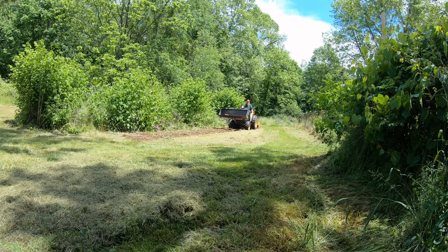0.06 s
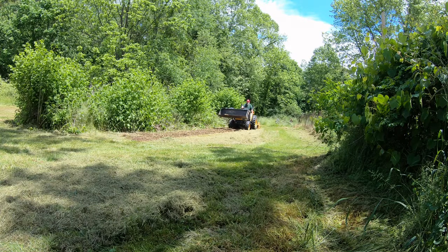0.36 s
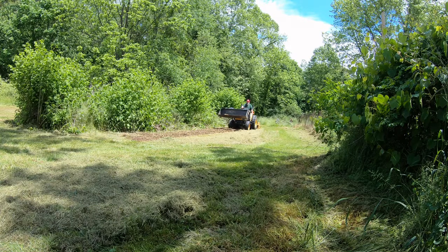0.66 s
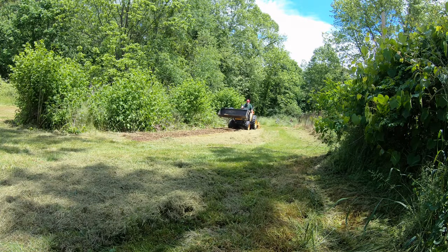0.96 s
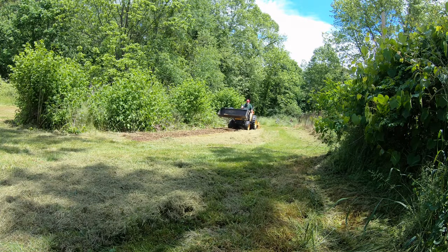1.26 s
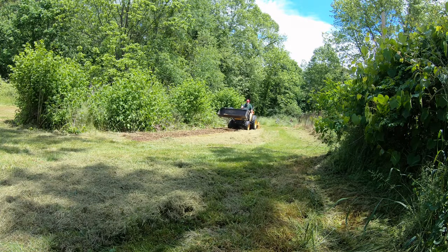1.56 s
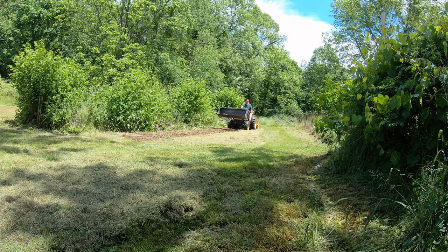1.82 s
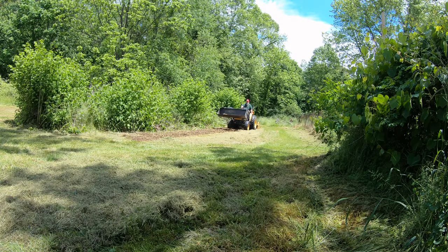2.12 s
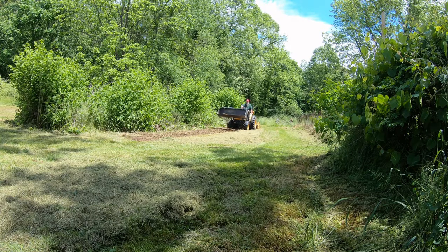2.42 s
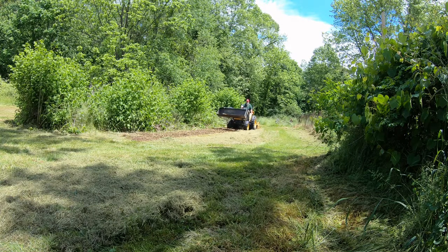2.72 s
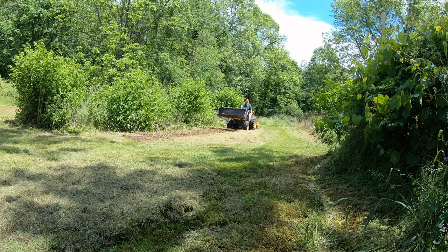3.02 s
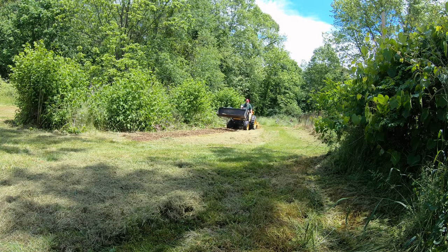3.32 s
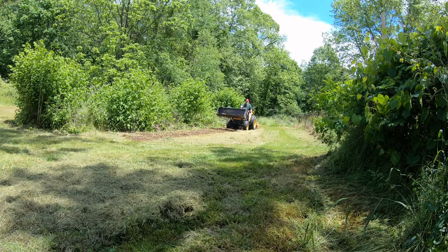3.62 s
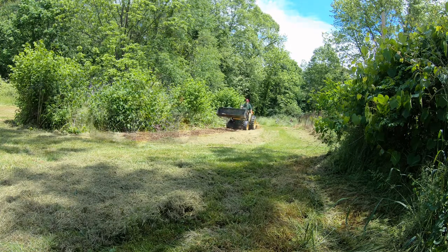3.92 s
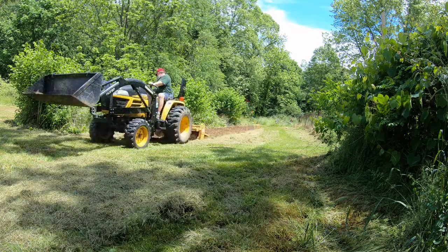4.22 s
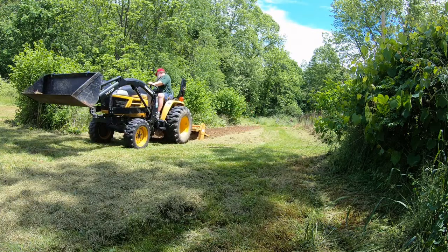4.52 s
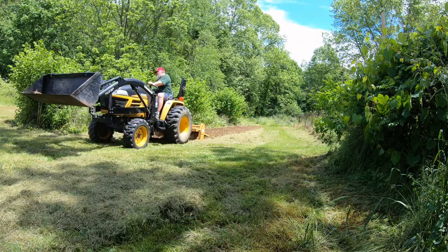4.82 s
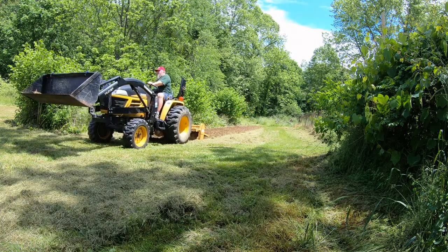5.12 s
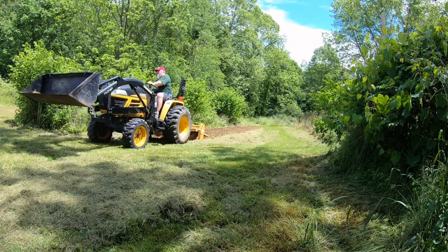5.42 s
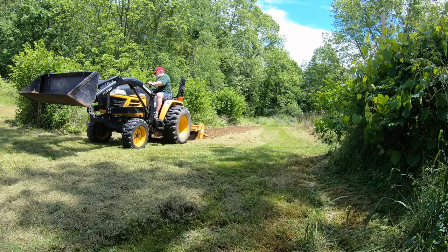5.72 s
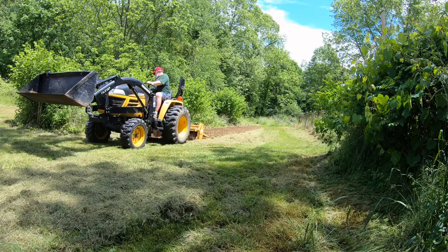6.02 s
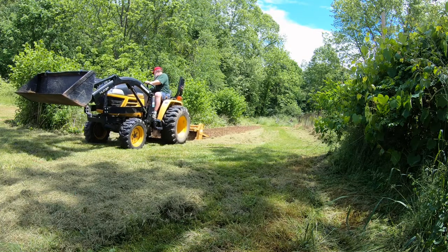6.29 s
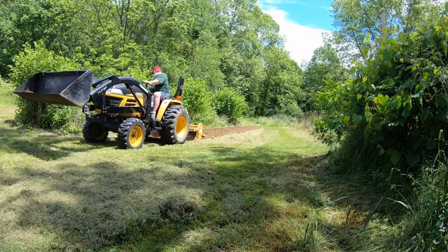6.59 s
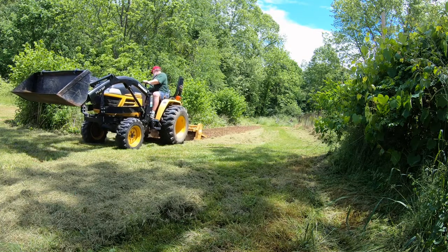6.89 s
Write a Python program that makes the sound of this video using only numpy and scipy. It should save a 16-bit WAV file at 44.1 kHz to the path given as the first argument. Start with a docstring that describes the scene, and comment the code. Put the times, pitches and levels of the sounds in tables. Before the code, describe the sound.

From the start, a diesel tractor runs at a distance in an open outdoor space, with a steady low exhaust drone and a fast, regular knocking clatter. Beneath it, a tiller makes a deep rumble and a soft hiss of crumbling soil. The engine speed barely changes, sagging slightly around 3 seconds. Between about 1.7 and 3.5 seconds, the blades catch several stones with faint, short, bright scrapes.

At about 3.8 seconds the tractor is suddenly close and clearly louder, its metallic rattle slightly to the left, joined by a thin gear whine and softly tumbling earth. The distant engine continues underneath until 5 seconds, the two drones beating gently against each other. Stones scrape briefly again near 4.6 and 6.7 seconds. The close engine labours a little more from around 6 seconds and keeps running to the end, at about 7 seconds.

```python
"""A compact tractor with a three-cylinder diesel pulls a rotary tiller through garden soil in a clearing.
The exhaust drones, the engine knocks in a pattern that repeats every cycle, gears whine, and the tines
churn soil and hit stones. Heavy soil drags the engine speed down; this load sets the level of most parts.
The tractor is heard far off, then suddenly close by on the left. For about a second both sound
together, and their exhausts beat against each other."""
import sys
import numpy as np
from scipy import signal
from scipy.io import wavfile

SR = 44100
rng = np.random.default_rng(int(sys.argv[2]) if len(sys.argv) > 2 else 0)


def to_wav(sig):
    """Store sig (one row per channel, or 1-D mono) as 16-bit WAV at the path in sys.argv[1].

    Samples outside -1..1 are clipped; the rate is SR.
    """
    pcm = np.clip(np.atleast_2d(sig), -1, 1) * 32767
    pcm = np.round(pcm).astype(np.int16)
    wavfile.write(sys.argv[1], SR, pcm.T)  # frames by channels


N = 306495
TIME = np.arange(N) / SR
NEAR_FROM_S, FAR_UNTIL_S = 3.762, 5.0
CYLINDERS = 3  # each fires once per engine cycle
FREE_HZ, SAG_HZ = 55.8, 1.1  # firing rate with no load, and its drop at full load
CYCLE_HZ = (FREE_HZ - SAG_HZ / 2) / CYLINDERS


def from_db(db):
    """Turn decibels into a gain."""
    return 10 ** (np.asarray(db) / 20)


def rms_one(x):
    """Scale a signal so that its average strength (rms) is 1."""
    return x / np.sqrt(np.mean(x ** 2) + 1e-20)


def at_hz(points, hz, column=1):
    """Read a table at any pitch, gliding between its rows."""
    columns = np.transpose(points)
    return np.interp(np.log(hz), np.log(columns[0]), columns[column])


def drift(rate_hz):
    """A slow random wobble, about 1 in size."""
    pole = np.exp(-200 * np.pi * rate_hz / SR)
    steps = rng.standard_normal(N // 100 + 1002)  # one per 100 samples
    slow = signal.lfilter([1], [1, -2 * pole, pole * pole], steps)[1000:]
    return np.interp(np.arange(N) / 100, np.arange(len(slow)), rms_one(slow))


def coloured(excite, spectrum, pan, low_hz, high_hz, count):
    """Build stereo noise in bands; excite(hz, k) gives band k's mid (shared) and side (opposed) noise."""
    out, edges, ears = 0, np.geomspace(low_hz, high_hz, count + 1), np.array([[1], [-1]])
    for k, (low, high) in enumerate(zip(edges, edges[1:])):
        hz = np.sqrt(low * high)
        band_pass = signal.butter(2, [low, high], "band", fs=SR, output="sos")
        mid, side = signal.sosfilt(band_pass, excite(hz, k))
        band = rms_one(mid) + from_db(at_hz(pan, hz, column=2)) * rms_one(side) * ears
        level = from_db(at_hz(spectrum, hz) + ears * at_hz(pan, hz) / 2)
        out = out + band * level * np.sqrt(high - low)
    return out / np.std(out.mean(axis=0))


def cyclic_noise(firings):
    """Four unrelated noises that come back alike on every engine cycle."""
    size = int(SR / CYCLE_HZ)
    position = (firings / CYLINDERS % 1 * size).astype(int)
    return rng.standard_normal((2, 2, size))[..., position]


def tone(firings, multiple, pan, flutter, wander):
    """A note that follows the engine speed; air and ground make it flutter in each ear."""
    angle = 2 * np.pi * (np.round(multiple) * firings / CYLINDERS + rng.random()) + wander * drift(5.2)
    ears = np.array([np.sin(angle + 0.35 * drift(5.3)) for _ in range(2)])
    balance = from_db(at_hz(pan, multiple * CYCLE_HZ) * np.array([[.5], [-.5]]))
    return np.sqrt(2) * ears * rms_one(1 + flutter * drift(3.4)) * balance


def under_load(load, free_db, load_db):
    """The gain of each part: its level moves in step with the load."""
    return {part: from_db(free_db[part] + load_db[part] * load) for part in free_db}


def in_tune(load, loudest_at, width):
    """The gain of a part that rings at one engine speed and fades to either side of it."""
    return np.exp(-((load - loudest_at) / width) ** 2 / 2)


# How fast the engine fires: t/s, firing rate/Hz
FAR_SPEED = [(0.0, 55.804), (1.4, 55.637), (2.6, 55.18), (3.1, 54.916), (3.45, 55.004), (3.9, 55.238),
             (4.4, 55.311), (5.0, 55.587)]
NEAR_SPEED = [(3.75, 55.206), (4.2, 55.181), (4.45, 55.17), (4.65, 55.11), (4.9, 55.403), (5.2, 55.496),
              (5.6, 55.312), (6.05, 54.682), (6.95, 54.864)]
def crankshaft(speed):
    """Count the firings so far and give the load (about 0-1): the slower, the harder the work."""
    rate = np.interp(TIME, *np.transpose(speed))
    return np.cumsum(rate) / SR, (FREE_HZ - rate) / SAG_HZ


# The exhaust's harmonics: multiple of the firing rate, level/dB (1-2 against drone, the rest against bark)
FAR_EXHAUST = [(1, 0.5), (2, -2.5), (3, 0), (4, -5.5), (5, -26), (6, -21.5), (7, -20)]
NEAR_EXHAUST = [(1, 0.5), (2, -4.5), (3, -0.5), (4, -11.5), (5, -17.5), (6, -15.5), (7, -21.5)]
def exhaust(firings, harmonics, drone, bark, waver=0.053):
    """Each firing sends one smooth push of air from the pipe; the higher harmonics waver more."""
    # the valve opens late in each firing; the open pipe end turns the push into a dip and a rebound
    opens_at, lead_rad = .66, .95
    out = 0
    for k, level_db in harmonics:
        level = from_db(level_db) * (drone if k <= 2 else bark) * (1 + waver * (k - 1) * drift(6.2))
        out = out - np.sqrt(2) * level * np.cos(2 * np.pi * k * (firings - opens_at) + lead_rad)
    return out


# Tone colour of the rushing gas: f/Hz, level/dB
RUMBLE = [(170, -6), (210, 1.5), (280, 0.5), (340, -3), (400, -8), (450, -3)]
def rumble(firings, pan, puff=0.62, puff_at=0.72, repeat=0.3):
    """Swirling gas leaves the pipe in puffs, one per firing."""
    gas = rng.standard_normal((2, 2, N)) + repeat * cyclic_noise(firings)
    gas = gas * (1 + puff * np.cos(2 * np.pi * (firings - puff_at)))
    return coloured(lambda hz, k: gas[k % 2], RUMBLE, pan, 177.5, 438, count=5)


# Knocks in one engine cycle: position/firings, f/Hz, width/octaves, level/dB, half length/firings
FAR_KNOCKS = [(0.02, 2080, .22, 7, .13), (.38, 2080, .15, 6, .13), (.28, 2400, .5, 5, .13),
              (1.0, 1400, .25, 8, .11), (1.12, 2900, .4, 5, .22), (1.58, 1400, .3, 6, .15),
              (1.6, 620, .25, 8, .2), (2.08, 2300, .6, 6, .14)]
NEAR_KNOCKS = [(0.06, 1480, .24, 11, .19), (.48, 1450, .24, 10, .2), (1.12, 1500, .24, 8.5, .16),
               (.52, 730, .25, 5, .1), (2.6, 730, .25, 3, .2), (1.57, 440, .2, 4, .15),
               (2.05, 2050, .3, 7.5, .14), (2.25, 2900, .5, 4, .14), (1.25, 2600, .6, 1, .2),
               (.28, 2900, .5, 1, .15)]
def knocking(firings, knocks):
    """Fuel injection and valves knock on the engine block; force(hz) says how hard at each pitch."""
    at, centre_hz, octaves, level_db, half_length = np.transpose(knocks)
    away = (firings - at[:, None] + CYLINDERS / 2) % CYLINDERS - CYLINDERS / 2
    bursts = from_db(level_db[:, None]) ** 2 * np.exp(-(away / half_length[:, None]) ** 2)

    def force(hz):
        reach = np.exp(-(np.log2(hz / centre_hz) / octaves) ** 2)
        return rms_one(np.sqrt(1 + reach @ bursts))
    return force


# Tone colour of the rattle: f/Hz, level/dB
FAR_CLATTER = [(450, -7), (620, -7.5), (780, -6.5), (1000, -10.5), (1200, -8), (1400, -3), (1780, -6),
               (2080, -4.5), (2350, -10), (2700, -5.5), (3300, -6.5), (3900, -12.5), (4500, -15.5)]
NEAR_CLATTER = [(450, -1.5), (560, -4.5), (740, 0.8), (900, -1.5), (1200, -2.2), (1400, -0.5), (1600, -1),
                (1820, -4), (2000, -4.5), (2400, -4.5), (3300, -6), (3900, -10), (4500, -13)]
# Pitches that the block and its covers lift: f/Hz, width/Hz, boost/dB
FAR_BODY = [(1335, 94, 4.5), (1980, 50, 4), (2110, 87, 6.5), (2520, 60, 5.5), (2717, 80, 5),
            (3160, 73, 4.5), (3510, 88, 3.5)]
NEAR_BODY = [(690, 140, 0.88), (1364, 70, 4.9), (1607, 53, 5), (1997, 180, 3.9), (2850, 54, 4.5),
             (3340, 170, 2.2)]
def clatter(firings, force, spectrum, body, pan):
    """The block rattles much alike on every cycle; the treble repeats least."""
    alike, fresh = cyclic_noise(firings + .001 * drift(12)), rng.standard_normal((2, 2, N))

    def excite(hz, k):
        repeat = 1.6 / (1 + (hz / 3200) ** 4)
        return force(hz) * (fresh[k % 2] + repeat * alike[k % 2])
    rattle = coloured(excite, spectrum, pan, 451.5, 4504, count=17)
    lift = sum((from_db(db) - 1) * signal.lfilter(*signal.iirpeak(hz, hz / width_hz, fs=SR), rattle)
               for hz, width_hz, db in body)
    return rms_one(rattle + lift)


# Notes on which the block rings hardest: multiple of the cycle rate, level/dB against the clatter
FAR_TONES = [(34, -22), (59, -19), (75, -20.5), (93, -18), (105, -17.5), (115, -13), (136, -20.5),
             (148, -18.5), (172, -17.5), (186, -17.5)]
NEAR_TONES = [(34, -18.5), (37, -19.5), (58, -15.5), (73, -16), (76, -11.5), (82, -15.5), (87, -12.5),
              (105, -25)]
def ringing(firings, force, notes, pan):
    """The metal rings with notes that pulse with the knocks."""
    return sum(from_db(db) * force(multiple * CYCLE_HZ)
               * tone(firings, multiple, pan, flutter=.15, wander=.25) for multiple, db in notes)


# Two panels: multiple of the cycle rate, level/dB, load where loudest (0-1), width in load
PANELS = [(82.25, -46.5, 0.02, 0.21), (108.1, -46, 0.12, 0.32)]
def panels(firings, force, load, pan):
    """Each panel buzzes near one engine speed."""
    return sum(in_tune(load, loudest_at, width) * ringing(firings, force, [(multiple, db)], pan)
               for multiple, db, loudest_at, width in PANELS)


# Two gears: teeth, far level/dB, near level/dB, load where loudest (0-1), width in load
GEARS = [(51, -54.5, -33.5, 0.53, 0.37), (66.4, -61, -40.5, 0.59, .16)]
def gears(firings, load, pan, close):
    """The gears that drive the tiller whine, each loudest at one engine speed."""
    return sum(from_db(near_db if close else far_db) * in_tune(load, loudest_at, width)
               * tone(firings, teeth, pan, flutter=0.2, wander=0.13)
               for teeth, far_db, near_db, loudest_at, width in GEARS)


# Tone colour of the flying soil: f/Hz, level/dB
FAR_SOIL = [(4500, 1), (5500, 0), (6700, -4), (8200, -14), (9200, -8.5), (10200, -6.5), (11500, -21),
            (14500, -22)]
NEAR_SOIL = [(4500, 3.5), (5500, -2.5), (6700, -4), (8200, -11.5), (9200, -8), (10200, -7), (11500, -18.5),
             (14500, -22)]
def soil(firings, spectrum, pan, crumbs_per_s=250, crumb_db=8, throb=0.14):
    """Crumbs of earth patter on the hood over a hiss that throbs with the engine."""
    hits = rng.random(N) < crumbs_per_s / SR
    crumbs = hits * rng.standard_normal(N) * from_db(crumb_db + 3 * drift(8))
    hiss = rng.standard_normal((2, 2, N)) * (1 + throb * np.cos(2 * np.pi * (firings - .15)))
    return coloured(lambda hz, k: hiss[k % 2] + crumbs, spectrum, pan, 4610, 14260, count=11)


# Tone colour of the tiller's deep boom: f/Hz, level/dB
ROTOR = [(25, -41), (45, -16), (70, -20), (95, -14.5), (125, -6), (150, -7), (175, -17)]
def rotor(firings, pan, repeat=0.29):
    """The tines, the tiller's spinning blades, thud through the ground and the hood booms."""
    thuds = rng.standard_normal((2, 2, N)) + repeat * cyclic_noise(firings)
    return coloured(lambda hz, k: thuds[k % 2], ROTOR, pan, 26.4, 175.5, count=9)


# Each far part by name: level/dB with no load; then its change/dB at full load
FAR_DB = dict(drone=-24, bark=-31, rumble=-39.5, clatter=-38, soil=-55, rotor=-34)
FAR_LOAD_DB = dict(drone=-1.5, bark=-2.3, rumble=3.5, clatter=2.55, soil=3.5, rotor=6)
# Direction, and scatter from trees and hedges: f/Hz, left minus right/dB, side minus mid/dB
FAR_PAN = [(60, 0.5, -15), (270, -1, -35), (450, 0.5, -17), (730, 0.5, -9), (1280, -2, -8.5),
           (3300, -0.6, -16.5), (5500, -1.8, -9), (8540, -4.5, -15), (14000, -2, -14)]
def far_tractor():
    """Engine and tiller work at the far end of the plot."""
    firings, load = crankshaft(FAR_SPEED)
    gain, force = under_load(load, FAR_DB, FAR_LOAD_DB), knocking(firings, FAR_KNOCKS)
    block = clatter(firings, force, FAR_CLATTER, FAR_BODY, FAR_PAN)
    block += ringing(firings, force, FAR_TONES, FAR_PAN)
    buzz = panels(firings, force, load, FAR_PAN)
    pipe = exhaust(firings, FAR_EXHAUST, gain["drone"], gain["bark"])
    gas = gain["rumble"] * rumble(firings, FAR_PAN)
    tiller = gain["soil"] * soil(firings, FAR_SOIL, FAR_PAN) + gain["rotor"] * rotor(firings, FAR_PAN)
    whine = gears(firings, load, FAR_PAN, close=False)
    return pipe + gas + gain["clatter"] * block + buzz + tiller + whine


# Stones hit by the tines: t/s, level/dB
STONES = [(1.6994, -57), (1.8794, -55), (2.4613, -52), (2.8494, -46), (3.0505, -45), (3.2809, -50),
          (3.466, -49), (4.582, -40), (6.7194, -41)]
def stones(decay_s=0.031):
    """Each stone gives a short, bright scrape on the steel."""
    force = sum(from_db(db) * (TIME >= s) * np.exp(-np.abs(TIME - s) / decay_s) for s, db in STONES)
    grit = rng.standard_normal((2, 2, N))
    return force * coloured(lambda hz, k: grit[k % 2], FAR_SOIL, FAR_PAN, 3300, 12800, count=5)


# Tone colour of the rolling clods: f/Hz, level/dB
EARTH = [(380, 1.5), (600, -5.5), (1100, -2)]
def tumbling_earth(start_db=-47.0, rise_db_per_s=3.0):
    """Loose clods roll about under the hood, louder as the tiller draws near."""
    clods = rng.standard_normal((2, 2, N))
    level = from_db(start_db + rise_db_per_s * (TIME - NEAR_FROM_S))
    return level * coloured(lambda hz, k: clods[k % 2], EARTH, NEAR_PAN, 368, 1100, count=4)


# Each near part by name: level/dB with no load; then its change/dB at full load
NEAR_DB = dict(drone=-20, bark=-25.5, rumble=-35.5, clatter=-29, soil=-47.5, rotor=-32.5)
NEAR_LOAD_DB = dict(drone=-0.5, bark=-2.2, rumble=5, clatter=1.27, soil=2.4, rotor=5)
# Direction and scatter close by: f/Hz, left minus right/dB, side minus mid/dB
NEAR_PAN = [(160, -2, -42), (450, 0, -17), (690, 6, -8.5), (1280, 5, -9), (2100, 4, -6.5), (3300, 3, -12),
            (5500, -4, -3), (8500, -0.5, -24), (14000, 0, -13)]
def near_tractor(head_start_firings=.88):
    """Engine and tiller work side-on and close."""
    firings, load = crankshaft(NEAR_SPEED)
    firings = firings + head_start_firings
    gain, force = under_load(load, NEAR_DB, NEAR_LOAD_DB), knocking(firings, NEAR_KNOCKS)
    block = clatter(firings, force, NEAR_CLATTER, NEAR_BODY, NEAR_PAN)
    block += ringing(firings, force, NEAR_TONES, NEAR_PAN)
    pipe = exhaust(firings, NEAR_EXHAUST, gain["drone"], gain["bark"])
    gas = gain["rumble"] * rumble(firings, NEAR_PAN)
    tiller = gain["soil"] * soil(firings, NEAR_SOIL, NEAR_PAN) + gain["rotor"] * rotor(firings, NEAR_PAN)
    tiller += tumbling_earth()
    whine = gears(firings, load, NEAR_PAN, close=True)
    return pipe + gas + gain["clatter"] * block + tiller + whine


def scene():
    """The close sound starts suddenly; the far one goes on beneath it for a while, then stops."""
    far_on = np.clip((FAR_UNTIL_S - TIME) / .01 + .5, 0, 1)
    return far_on * far_tractor() + (TIME >= NEAR_FROM_S) * near_tractor() + stones()


def record(dry):
    """The two microphones lose the deepest bass a little differently; the top is cut steeply."""
    bass_cuts_hz, top_cut_hz = (15, 8), 14400
    ears = [signal.sosfilt(signal.butter(1, hz, "high", fs=SR, output="sos"), x)
            for hz, x in zip(bass_cuts_hz, dry)]
    return signal.sosfilt(signal.ellip(10, .1, 80, top_cut_hz, fs=SR, output="sos"), ears)


dry = scene()
out = record(dry)
to_wav(out)
```